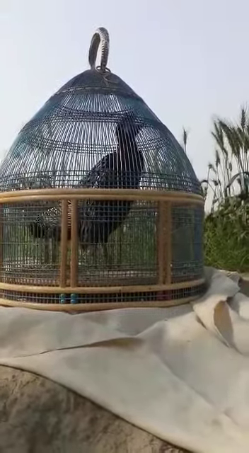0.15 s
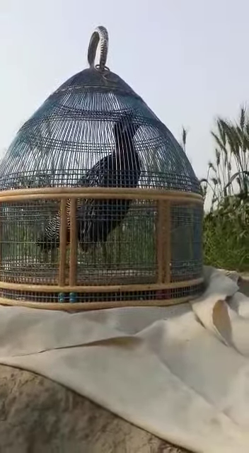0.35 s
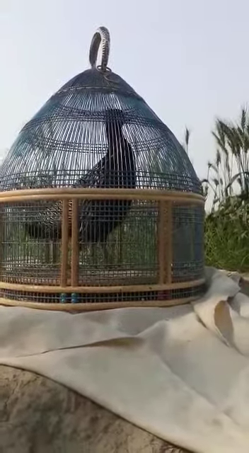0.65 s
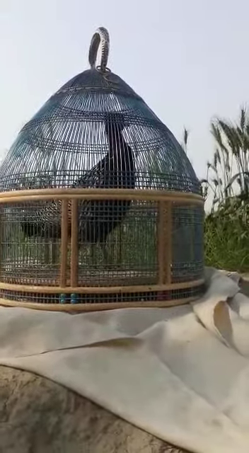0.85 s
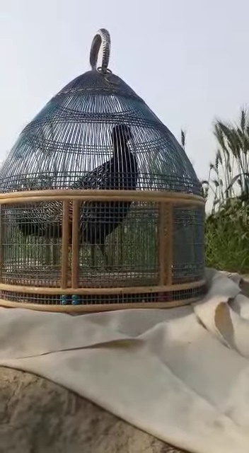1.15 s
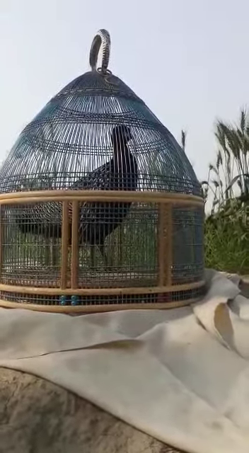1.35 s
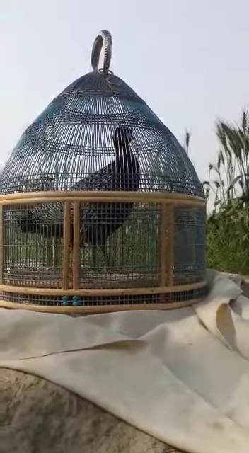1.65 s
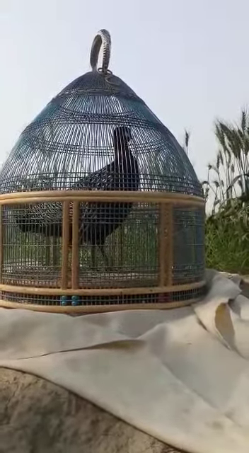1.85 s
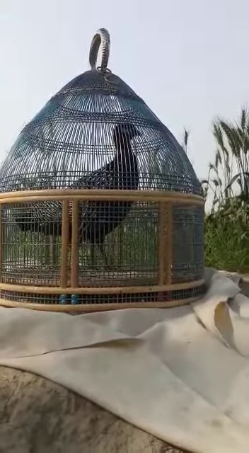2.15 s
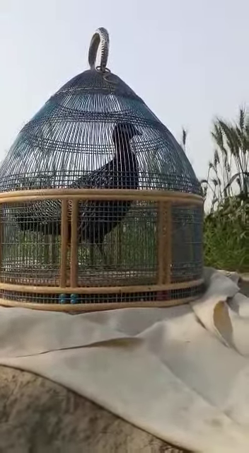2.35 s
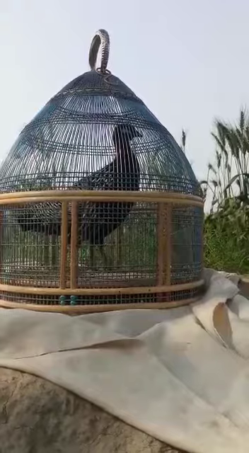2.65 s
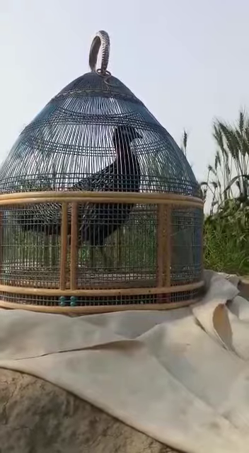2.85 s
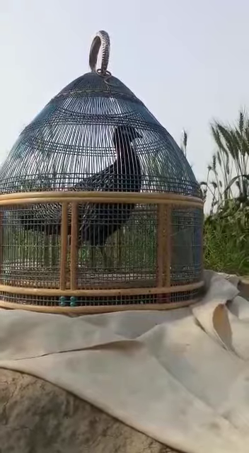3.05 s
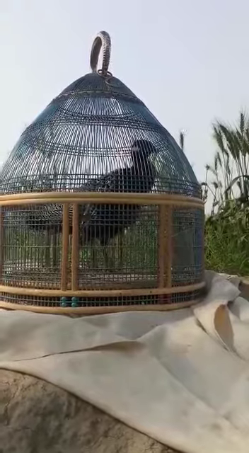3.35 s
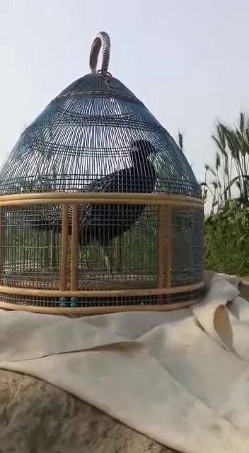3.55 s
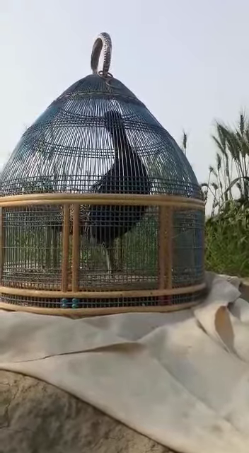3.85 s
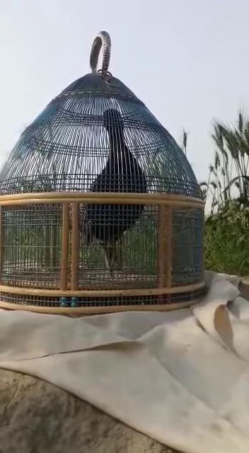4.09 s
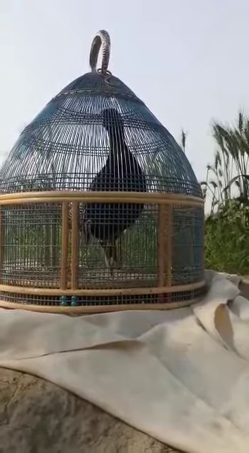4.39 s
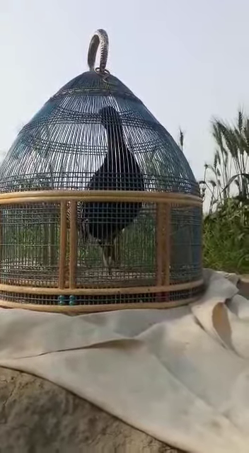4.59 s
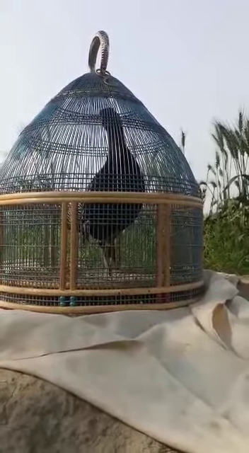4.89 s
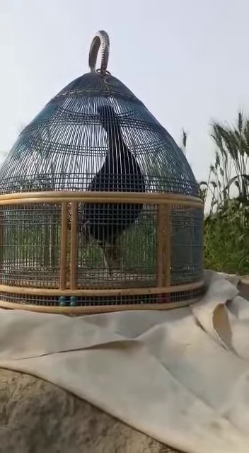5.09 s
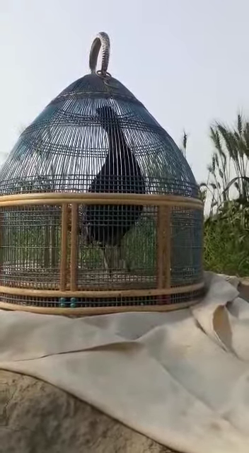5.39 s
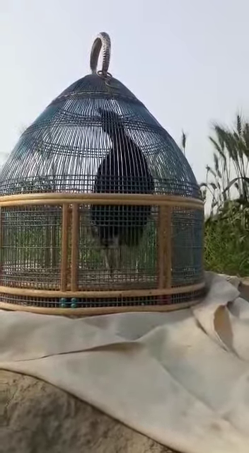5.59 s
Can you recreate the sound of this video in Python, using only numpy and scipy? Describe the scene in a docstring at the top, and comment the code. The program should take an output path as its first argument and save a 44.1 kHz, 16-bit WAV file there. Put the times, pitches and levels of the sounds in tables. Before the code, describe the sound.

Harsh buzzing bird calls up close, a long quiet gap of far-off birdsong and low engine hum, then sudden sharp high squeaks.

```python
"""One hears a caged francolin close by, outdoors: rasping notes, then pure high squeaks; small birds chirp far off.
A rasp is a whistle swung in pitch over two hundred times a second; a squeak is the same whistle without the trill.
Cage reflections and diffuse scattering answer the voice. The far birds are gliding sines and patchy noise, over
soft air noise and the throb and hum of a distant engine. A limiter flattens loud notes, and a gain control
stays down for a second after each loud sound, so that the far field returns only in the gap between calls."""
import sys
import numpy as np
from scipy import signal
from scipy.fft import rfft, irfft, next_fast_len
from scipy.io import wavfile
from scipy.ndimage import uniform_filter1d, minimum_filter1d, map_coordinates

SR = 44100
rng = np.random.default_rng(int(sys.argv[2]) if len(sys.argv) > 2 else 0)


def inscribe(sig):
    """Save sig as 16-bit PCM at rate SR to the path in sys.argv[1].

    A 1-D sig is mono; a 2-D sig holds one channel per row.
    Samples are clipped to [-1, 1] before scaling.
    """
    pcm = np.round(np.clip(np.atleast_2d(sig).T, -1, 1) * 32767)
    wavfile.write(sys.argv[1], SR, pcm.astype(np.int16))


N = 252693
TIME = np.arange(N) / SR


def amp(db):
    """Logarithmic level: decibels to amplitude gain."""
    return 10 ** (np.asarray(db) / 20)


def unit(x):
    """Normalization: scale to an rms of 1."""
    return x / np.sqrt(np.mean(x ** 2) + 1e-20)


def curves(rows, t=TIME):
    """Linear interpolation: each column after the first, joined by straight lines over t."""
    knots, *columns = np.transpose(rows)
    return [np.interp(t, np.sort(knots), column) for column in columns]


def wobble(rate):
    """Band-limited fluctuation: a smooth random curve with this many knots a second."""
    knots = rng.standard_normal(int(N * rate / SR) + 4)
    return map_coordinates(knots, [TIME * rate])


def phase_of(hz):
    """Phase is the running integral of frequency."""
    return 2 * np.pi * np.cumsum(hz) / SR


def coloured(x, points):
    """Minimum-phase filtering through (Hz, dB) points: causal, so spectral peaks ring after the sound."""
    m = 2 * next_fast_len(N // 2 + 4096)
    hz, db = np.transpose(points)
    response_db = np.interp(np.log(np.fft.rfftfreq(m, 1 / SR) + 1), np.log(hz), db)
    cepstrum = irfft(np.log(amp(response_db)))
    # folding the cepstrum onto positive times makes the filter causal
    cepstrum[1:m // 2] *= 2
    cepstrum[m // 2 + 1:] = 0
    return irfft(rfft(x, m) * np.exp(rfft(cepstrum)), m)[:N]


def scatter(x, delay, t60):
    """Diffuse scattering: convolution with a noise tail that peaks at the delay and decays exponentially."""
    t = TIME[:SR]
    decay = amp(-60 * np.abs(t - delay) / t60)
    onset = np.clip((t - delay) / 0.0029 + 1, 0, 1)
    tail = rng.standard_normal(SR) * decay * onset
    return signal.fftconvolve(x, tail / np.linalg.norm(tail))[:N]


def delayed(x, delay):
    """Discrete reflection: the same wave after a longer path."""
    return np.interp(TIME - delay, TIME, x, left=0)


def add(track, start, sound):
    """Superposition: mix a sound into the track at a time in seconds."""
    part = track[max(round(start * SR), 0):][:len(sound)]
    part += sound[:len(part)]


def ramp(t, length):
    """Linear envelope: rise from 0 to 1 over a length of time."""
    return np.clip(t / length, 0, 1)


# Spectrum of the air noise. Each row: frequency [Hz], relative density [dB per Hz].
AIR_SPECTRUM = [(40, -1), (250, 3), (450, -3.5), (1000, -4.5), (3000, -10), (9000, -16.5), (16000, -12.5)]


def air_noise(air_db=-73.0):
    """Broadband noise: many small random pressures, shaped by a smooth spectrum."""
    return amp(air_db) * unit(coloured(rng.standard_normal(N), AIR_SPECTRUM))


# Spectrum of the massed birds. Each row: frequency [Hz], relative density [dB per Hz].
CHORUS_SPECTRUM = [(710, -40), (1200, -14.5), (1480, -7), (2220, -11), (2940, 0), (3530, -5.5), (4360, 1),
                   (5240, -5), (5710, -8), (6670, -9), (7780, -15.5), (9430, -22.5), (12000, -21),
                   (15600, -54), (22000, -120)]
# Level of the massed birds. Each row: time [s], rms level [dB].
CHORUS_LEVEL = [(1.1, -57.5), (1.35, -72), (1.6, -65.5), (3.2, -64), (3.42, -58.5), (3.6, -65), (4.5, -64),
                (5.1, -63)]


def far_chorus(patchy_db=3):
    """Incoherent summation: many far birds merge into noise, patchy in time and frequency."""
    chorus_level, = curves(CHORUS_LEVEL)
    spectrogram = signal.stft(rng.standard_normal(N), nperseg=512)[2]
    patches = uniform_filter1d(rng.standard_normal(spectrogram.shape), size=7, axis=0)
    patches = uniform_filter1d(patches, size=16, axis=1)
    wash = signal.istft(spectrogram * amp(patchy_db * unit(patches)), nperseg=512)[1][:N]
    return amp(chorus_level) * unit(coloured(wash, CHORUS_SPECTRUM))


# Course of the engine. Each row: time [s], mean firing rate [per s], relative exhaust level [dB],
# relative hum level [dB].
ENGINE_COURSE = [(.5, 29.7, -72, -59), (1.9, 29.3, -65.5, -63.5), (3.3, 29.8, -62, -55.5),
                 (3.6, 29.7, -63, -60.5), (4.35, 27.3, -63.5, -60), (4.7, 26.7, -62.5, -51.5)]
# Resonance of the exhaust. Each row: frequency [Hz], relative response [dB].
EXHAUST_RESPONSE = [(25, -22), (58, -5), (85, -2), (115, -4.5), (148, 0), (180, -7.5), (230, -20.5),
                    (400, -29.5), (900, -62)]


def engine(hum_hz=71, uneven_db=2.5, stumble=0.04, rumble=1.0, exhaust_db=3.5, hum_db=-2):
    """Impulse excitation of a resonator: a dull thud per firing, beside rumble and a nearly steady hum."""
    rate, exhaust_level, hum_level = curves(ENGINE_COURSE)
    cycles = np.cumsum(rate * (1 + stumble * wobble(40))) / SR
    firings = np.diff(np.floor(cycles), prepend=0) * amp(uneven_db * wobble(29))
    excitation = unit(firings) + rumble * rng.standard_normal(N)
    thuds = unit(coloured(excitation, EXHAUST_RESPONSE))
    hum = unit(np.sin(phase_of(hum_hz + .5 * wobble(2))))
    return amp(exhaust_level + exhaust_db) * thuds + amp(hum_level + hum_db) * hum


def glide(length, start_hz, end_hz, waver):
    """Frequency modulation: a wavering sine that swells and fades as it slides."""
    u = np.linspace(0, 1, int(length * SR))
    flutter = map_coordinates(rng.standard_normal(size=256), [TIME[:len(u)] * 380])
    hz = (start_hz + (end_hz - start_hz) * u) * (1 + waver * flutter)
    return np.sqrt(2) * np.sin(np.pi * u) * np.sin(phase_of(hz))


# The nearest small chirps. Each row: start [s], length [s], start pitch [Hz], end pitch [Hz],
# relative level [dB].
PEEPS = [(0.788, .12, 1670, 1623, -64), (1.316, 0.057, 3900, 4230, -50.5), (1.395, 0.088, 1840, 1618, -64),
         (1.658, 0.0338, 4070, 3733, -54.5), (1.867, 0.065, 4006, 5184, -54.5),
         (2.27, 0.13, 6550, 6300, -66.5), (2.897, 0.15, 6150, 6180, -65), (2.967, 0.36, 1565, 1480, -74.5),
         (3.18, .065, 4010, 4090, -60), (3.249, .05, 5188, 4305, -59), (3.364, 0.055, 4677, 4360, -57),
         (3.379, .016, 5110, 3150, -57), (3.372, 0.29, 1508, 1680, -63.5), (3.528, .063, 4385, 5450, -59),
         (3.575, .13, 2274, 1574, -62.5), (3.947, 0.072, 2360, 2327, -66), (3.962, 0.0587, 4770, 4650, -57),
         (4.137, .083, 3196, 2684, -53), (4.146, 0.02973, 4652, 3592, -57),
         (4.206, 0.056, 2645, 2186, -53.5), (4.325, 0.11, 3260, 2566, -59), (4.459, 0.061, 6180, 6020, -70),
         (5.148, 0.0142, 4930, 3640, -47), (5.192, .08, 2755, 2652, -65), (5.202, .075, 1330, 1340, -67.5),
         (5.478, 0.023, 4547, 3797, -52), (5.515, 0.078, 1331, 1298, -69.5)]
# fainter chirps at random, each falling by half to twice the typical interval
TWITTER_PER_S, TWITTER_HZ, TWITTER_SPREAD_OCTAVES = 5.5, 4490, .25
TWITTER_FALL_OCTAVES, TWITTER_LENGTH_S, TWITTER_RELATIVE_DB = 0.18, .06, -65


def peeps(direct_db=-5, wet_db=-2.0):
    """Direct and diffuse sound: short glides of small birds, blurred by distance."""
    song = np.zeros(N)
    for start, length, start_hz, end_hz, db in PEEPS:
        add(song, start, amp(db) * glide(length, start_hz, end_hz, waver=0.0083))
    for k in range(int(TWITTER_PER_S * N / SR)):
        hz = TWITTER_HZ * 2 ** (TWITTER_SPREAD_OCTAVES * rng.standard_normal())
        end_hz = hz * 2 ** (-TWITTER_FALL_OCTAVES * rng.uniform(.5, 2))
        chirp = glide(TWITTER_LENGTH_S, hz, end_hz, waver=0.026)
        add(song, (k + rng.random()) / TWITTER_PER_S, amp(TWITTER_RELATIVE_DB) * chirp)
    return amp(direct_db) * song + amp(wet_db) * scatter(song, delay=0.0095, t60=0.3)


# Contour of a distant slur. Each row: progress [-1 to 0 held note, 0 to 1 fall], pitch before
# transposition [Hz], relative level [dB].
SLUR_CONTOUR = [(-0.986, 3270, -9), (-0.52, 3200, 1.5), (-0.063, 3100, 0.5), (0.03, 3040, 3.5),
                (.25, 2680, 0), (0.65, 2129.93, 1), (.8, 1780, -2.5), (0.87, 1499.98, -18)]
# The slurs. Each row: time where the fall begins [s], held time [s], pitch ratio [1], relative level [dB].
SLURS = [(1.051, 0.06, 0.98, -50.5), (1.636, 0.098, 1.034, -52), (1.987, 0.056, 0.9995, -49.5),
         (2.343, .04, 1.0269, -50.5), (2.705, .065, 1, -53.5), (3.098, 0.071, 0.96, -52.5),
         (3.496, .05, 0.92, -50.5), (3.795, 0.057, .96, -57), (4.72, 0.086, 1.0303, -51.5),
         (5.039, .06, 1.035, -52.5), (5.394, 0.098, 1.015, -50)]
# a short, hoarse downward glide leads into every slur
LEAD_AHEAD_S, LEAD_LENGTH_S, LEAD_START_HZ, LEAD_END_HZ, LEAD_DB = .12, 0.05, 4530, 3402, -5


def slurs(waver=0.0068, fall=0.061, direct_db=-7.5, wet_db=-7, fading_db=2, echo_s=0.023, echo_db=-9):
    """Portamento with fading: a distant bird holds a thin note and lets it fall, again and again."""
    song, flutter = np.zeros(N), 1 + waver * wobble(270)
    for fall_start, hold, ratio, db in SLURS:
        t = np.arange(-hold, fall, 1 / SR)
        hz, shape_db = curves(SLUR_CONTOUR, t / np.where(t < 0, hold, fall))
        hz = hz * ratio * np.interp(fall_start + t, TIME, flutter)
        level = amp(db + shape_db + fading_db * wobble(61.3)[:len(t)])
        add(song, fall_start - hold, level * np.sqrt(2) * np.sin(phase_of(hz)))
        lead = glide(LEAD_LENGTH_S, LEAD_START_HZ, LEAD_END_HZ, waver=0.03328)
        add(song, fall_start - LEAD_AHEAD_S, amp(db + LEAD_DB) * lead)
    song = song + amp(echo_db) * delayed(song, echo_s)  # a field edge doubles the song
    return amp(direct_db) * song + amp(wet_db) * scatter(song, delay=0.0042, t60=0.3)


# Breaks of the francolin's voice. Each row: time [s], relative level [dB].
CRACKS = [(.029, -15), (0.1966, -13), (0.2608, -5), (0.2854, -9), (5.6091, 3), (5.615, 1.5), (5.6298, 12.5),
          (5.6594, 13.5)]
# Colour of the breaks. Each row: frequency [Hz], relative response [dB].
CRACK_COLOUR = [(60, -24.5), (250, -6.5), (700, -17.5), (1400, -13.5), (2800, 0), (4300, 2), (8000, -7),
                (11000, -11), (16000, -13.5)]


def cracks(t60=0.0092):
    """Transient excitation: a dry, decaying noise snap where the voice breaks between registers."""
    track, t = np.zeros(N), TIME[:SR // 25]
    for start, db in CRACKS:
        add(track, start, amp(db - 60 * t / t60) * rng.standard_normal(len(t)))
    return coloured(track, CRACK_COLOUR)


def whistle(hz, second_db=-18, third_db=-34, hiss_db=-29):
    """Harmonic series: the membrane's tone, with weak overtones and a little hiss."""
    phase = phase_of(hz)
    overtones = amp(second_db) * np.sin(2 * phase) + amp(third_db) * np.sin(3 * phase)
    return np.sin(phase) + overtones + amp(hiss_db) * rng.standard_normal(len(hz))


# Slow bends of a rasp's pitch, down and then up. Each row: centre after the start [s], width [s],
# size at full bend [octaves].
BENDS = [(.028, .012, -.12), (.067, .025, .25)]
DROOP_OCTAVES = .35  # the pitch drops as a rasp dies away
EFFORT_S, EFFORT_DB = 0.025, 1.5  # time effort takes to build or ebb, and the level it adds
SLACK_TRILL_HZ, FULL_TRILL_HZ = 216.1, 253  # mean trill rate at no and at full effort
SOFT_DEPTH_OCTAVES, LOUD_DEPTH_OCTAVES = 0.34, .51  # the mean swing widens with loudness


def rasp(length, hz, bend, attack, release, db, swell_db, rate_jitter=0.022, grit=0.1, throb_db=3.5,
         steepness=1.4, uneven=.06, shimmer_db=0.14):
    """Joint frequency and amplitude modulation: a slower vibration swings pitch and loudness together."""
    t = np.arange(0, length, 1 / SR)
    effort = ramp(np.minimum(t, length - t), EFFORT_S)
    dying = 1 - ramp(length - t, release)
    loudness = ramp(t, attack) * (1 - dying)

    rate = SLACK_TRILL_HZ + (FULL_TRILL_HZ - SLACK_TRILL_HZ) * effort
    swing = np.sin(phase_of(rate * (1 + rate_jitter * wobble(250)[:len(t)])))
    depth = SOFT_DEPTH_OCTAVES + (LOUD_DEPTH_OCTAVES - SOFT_DEPTH_OCTAVES) * loudness
    depth = depth * (1 + uneven * wobble(400)[:len(t)])

    bends = sum(size * np.exp(-((t - at) / width) ** 2) for at, width, size in BENDS)
    centre = bend * bends - DROOP_OCTAVES * dying ** 2
    trill = depth * (swing + grit * wobble(2200)[:len(t)])
    tone = whistle(hz * 2 ** (centre + trill))

    level_db = db + swell_db * (t / length - .5) + shimmer_db * wobble(500)[:len(t)]
    level_db = level_db - EFFORT_DB * (2 - effort)
    # the membrane is weakest at the tight top of each swing
    level_db = level_db - throb_db * swing * 2 * depth
    return loudness ** steepness * amp(level_db) * tone


SQUEAK_RELEASE_S, SQUEAK_ROUNDNESS, SQUEAK_ONSET_POWER = .001, 1.5, 1.7  # stop time; arch and attack shapes


def squeak(length, start_hz, turn_hz, end_hz, turn, attack, db, swell_db, waver=0.0035, shimmer_db=1):
    """Pure-tone glide: with the trill at rest, the whistle draws one clean arch or dip."""
    t = np.arange(0, length, 1 / SR)
    u = t / length
    away_from_turn = np.interp(u, [0, turn, 1], [1, 0, 1]) ** SQUEAK_ROUNDNESS
    hz = turn_hz + (np.where(u < turn, start_hz, end_hz) - turn_hz) * away_from_turn
    level = amp(db + swell_db * (u - .5) + shimmer_db * wobble(300)[:len(t)])
    envelope = ramp(t, attack) ** SQUEAK_ONSET_POWER * ramp(length - t, SQUEAK_RELEASE_S)
    return envelope * level * whistle(hz * (1 + waver * wobble(900)[:len(t)]))


# The rasps. Each row: start [s], length [s], centre pitch before bends [Hz], bend [0-1], attack [s],
# release [s], relative level [dB], level change from start to end [dB].
RASPS = [(0.022, 0.11021, 3794, .9, 0.016, .017, 3.5, 1.5), (0.19, .07, 3736, 1, .018, 0.00073, 3, 1),
         (0.284, 0.11, 3699, .15, 0.0011, .028, -1.5, -3.5)]
# The squeaks. Each row: start [s], length [s], start pitch [Hz], turning pitch [Hz], end pitch [Hz],
# turn [share of length], attack [s], relative level [dB], level change from start to end [dB].
SQUEAKS = [(0.2595, 0.024, 6528, 6608, 6384, .3, .001, -9, -4.5),
           (5.5723, .036, 3198, 4080, 3700, 0.6, .0095, 0.5, 8),
           (5.608, 0.0076, 3400, 2520, 2400, 0.6069, 0.0013, 10, 7),
           (5.611, 0.0065, 4900, 4701, 4100, .4, 0.0022, 1, -7.5),
           (5.6303, 0.025, 6203, 6839, 6359, .52, .004, 13.5, 1),
           (5.6578, 0.0045, 5278, 2974, 2828, .5, 0.00079, 6.5, -8.5)]


def syrinx():
    """Source of the source-filter model: rasps and squeaks of one whistle, before the throat."""
    voice = np.zeros(N)
    for start, *note in RASPS:
        add(voice, start, rasp(*note))
    for start, *note in SQUEAKS:
        add(voice, start, squeak(*note))
    return voice


# Filter of throat and beak. Each row: frequency [Hz], response [dB].
THROAT = [(300, -19), (1500, -12), (2100, -21.5), (2450, -10.5), (2800, -6.5), (3450, -5.5), (4150, 2.5),
          (4900, -7), (5800, -4), (6700, -2), (8300, 1.5), (10000, -9.5), (16000, -6.5)]
# Narrow resonances that ring on behind the voice. Each row: frequency [Hz], width [Hz], level [dB].
RINGS = [(2786, 55, -0.5), (4380, 350, -7.5)]


def francolin_voice():
    """Source-filter principle: throat and beak shape the syrinx, and two narrow resonances ring on."""
    voice = coloured(syrinx(), THROAT) + cracks()
    ringing = 0
    for hz, width, db in RINGS:
        ringing = ringing + amp(db) * signal.lfilter(*signal.iirpeak(hz, hz / width, fs=SR), voice)
    return voice + ringing


# Reflections inside the cage. Each row: delay [s], level [dB].
CAGE = [(.00095, -10), (.0024, -16), (.0045, -19), (.0063, -20)]


def cage_reflections(voice):
    """Early reflection: a few discrete copies within milliseconds colour the voice."""
    return sum(amp(db) * delayed(voice, delay) for delay, db in CAGE)


# Colour of sound thrown back by stalks and leaves. Each row: frequency [Hz], response [dB].
FOLIAGE = [(500, -5), (1500, 12), (2200, 7), (2800, 0), (4200, 4), (5300, 11), (6700, 6.5), (8800, 12.5),
           (14000, 5)]


def surroundings(voice, near_db=-28, echo_db=-28, far_db=-50, far_top_hz=6000):
    """Late scattering: the ground answers first, the standing crop next, the open field last and dullest."""
    thrown = coloured(voice, FOLIAGE)
    near = amp(near_db) * scatter(thrown, delay=.008, t60=.15)
    echo = amp(echo_db) * scatter(thrown, delay=.037, t60=0.071)
    dull = signal.sosfilt(signal.butter(2, far_top_hz, fs=SR, output="sos"), voice)
    return near + echo + amp(far_db) * scatter(dull, delay=.05, t60=.75)


def francolin():
    """Superposition of direct sound, early reflections and late scattering."""
    voice = francolin_voice()
    return voice + cage_reflections(voice) + surroundings(voice)


def scene(francolin_db=15.5):
    """Linear superposition: the far field and the close bird, in one channel."""
    background = air_noise() + far_chorus() + engine() + peeps() + slurs()
    return (background + amp(francolin_db) * francolin())[None]


def gain_control(x, threshold_db=-24, cut_db=17.0, hold=1.02, recovery=.36):
    """Automatic gain: starts turned down; each loud sound cuts and holds it, then it creeps back."""
    since_loud = TIME - np.maximum.accumulate(TIME * (np.abs(x) > amp(threshold_db)))
    cut = uniform_filter1d(1 - ramp(since_loud - hold, recovery), size=45)
    return x * amp(-cut_db * cut)


def limiter(x, ceiling=1.057):
    """Peak limiting: the gain dips around each peak above the ceiling, smoothed over milliseconds."""
    needed = np.minimum(1, ceiling / (np.abs(x) + 1e-9))
    return x * uniform_filter1d(minimum_filter1d(needed, size=133), size=89)


def overload(x, top=0.72, hardness=4, lopsided=0.11, buzz=0.2, buzz_hz=1100):
    """Nonlinear distortion: soft clipping, then a squared term that adds an octave and a low buzz."""
    x = x / (1 + np.abs(x / top) ** hardness) ** (1 / hardness)
    square = signal.sosfilt(signal.butter(3, 160, "high", fs=SR, output="sos"), x ** 2)
    # the low part of the square follows the trill's throb
    low = signal.sosfilt(signal.butter(2, buzz_hz, fs=SR, output="sos"), square)
    return x + lopsided * square + buzz * low


# Response of the microphone port, with a notch in the treble. Each row: frequency [Hz], response [dB].
MICROPHONE = [(100, 1), (2000, 0.5), (4000, 1.5), (5200, 1), (6600, 0), (8000, 3), (8700, -4), (9500, -9),
              (9950, -13.5), (10700, -6.5), (11800, -4.5), (15500, 1)]
TOP_HZ, TOP_SLOPE_HZ = 16200, 500  # nothing passes above the top; the slope lies just below it


def record(dry):
    """Transmission chain: gain control, limiter, overload, microphone colour and band limit."""
    x = overload(limiter(gain_control(dry[0])))
    m = next_fast_len(N + SR // 2)
    band = ramp(TOP_HZ - np.fft.rfftfreq(m, 1 / SR), TOP_SLOPE_HZ)
    return irfft(rfft(coloured(x, MICROPHONE), m) * band, m)[None, :N]


dry = scene()
out = record(dry)
inscribe(out)
```